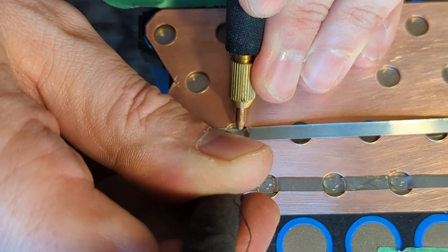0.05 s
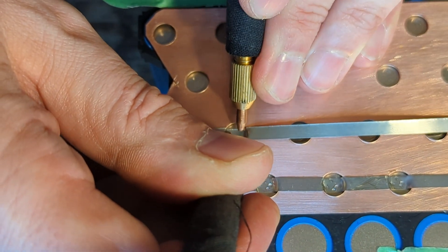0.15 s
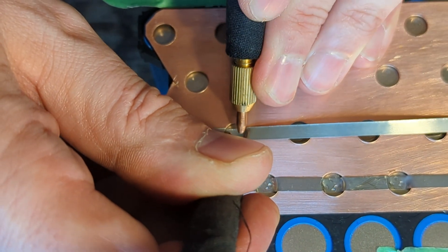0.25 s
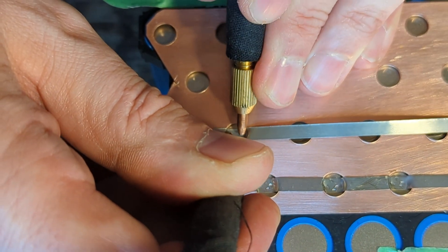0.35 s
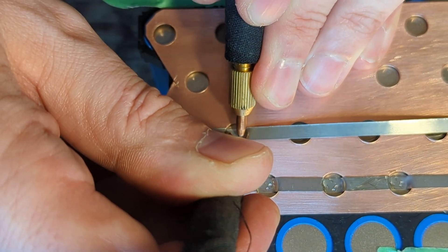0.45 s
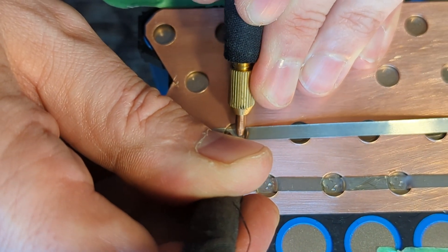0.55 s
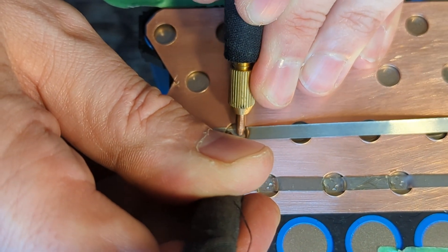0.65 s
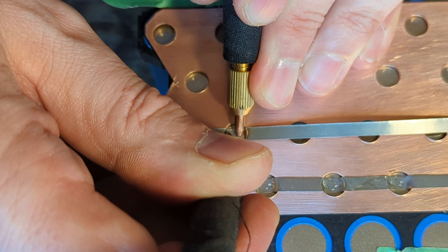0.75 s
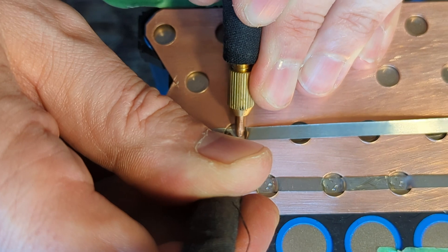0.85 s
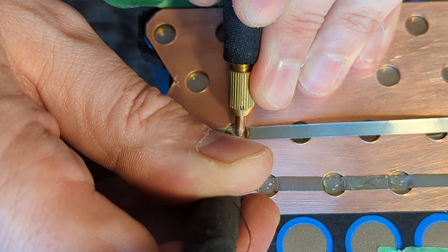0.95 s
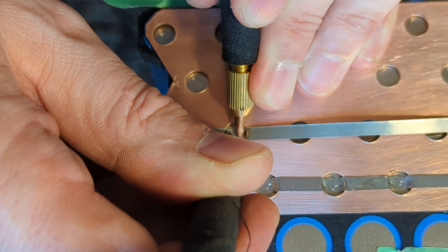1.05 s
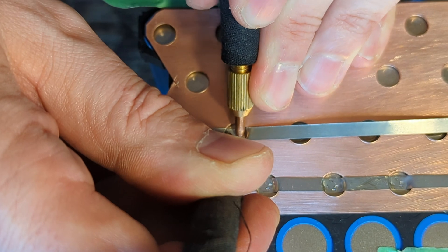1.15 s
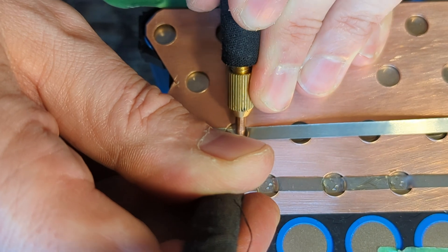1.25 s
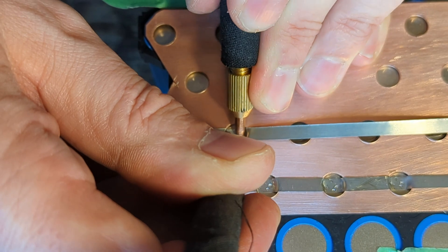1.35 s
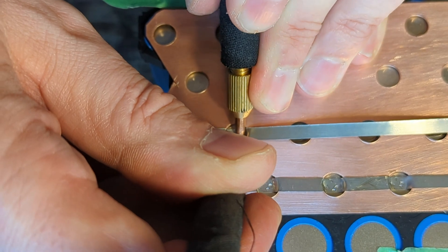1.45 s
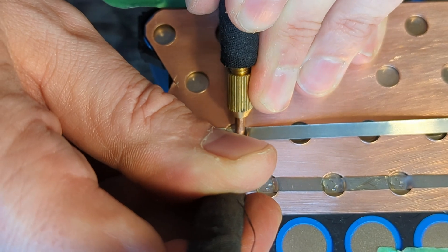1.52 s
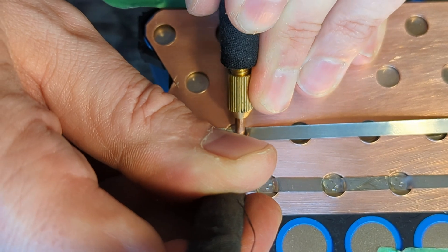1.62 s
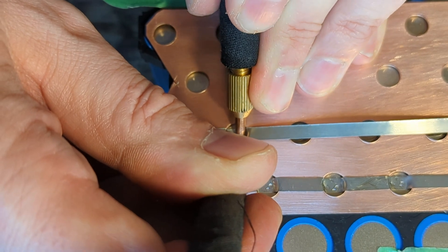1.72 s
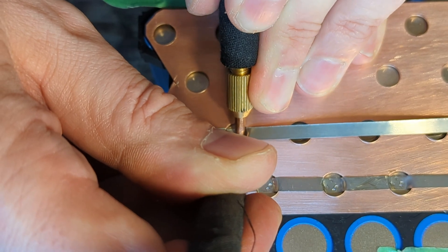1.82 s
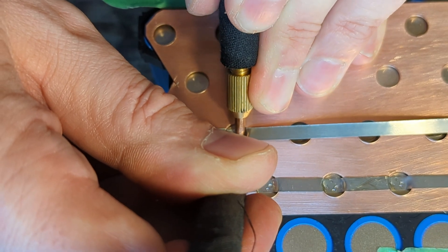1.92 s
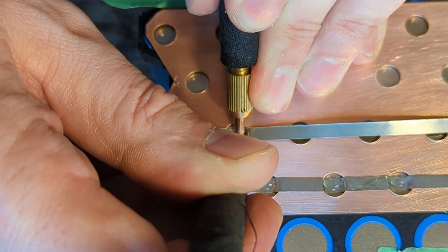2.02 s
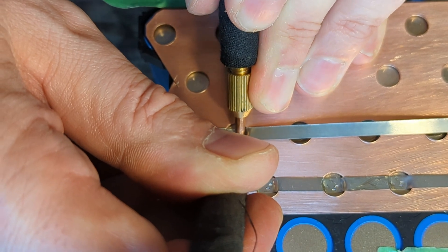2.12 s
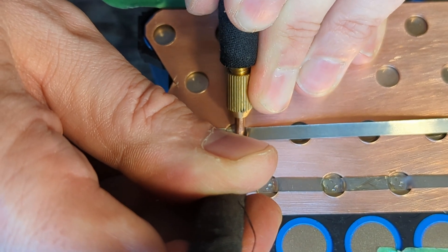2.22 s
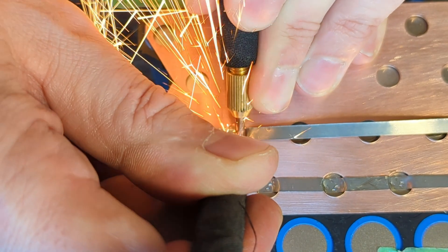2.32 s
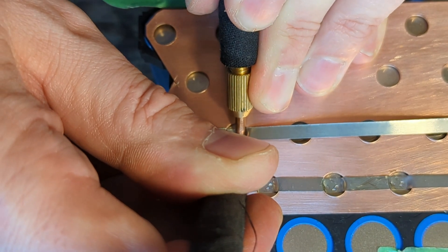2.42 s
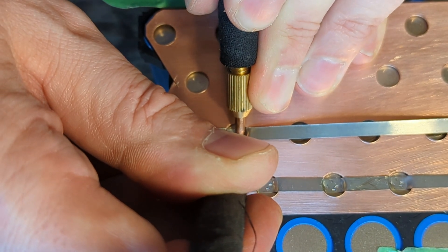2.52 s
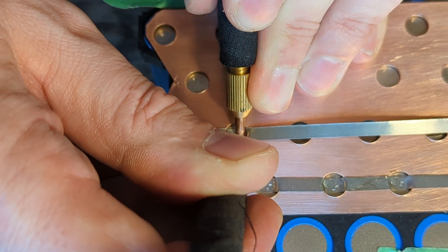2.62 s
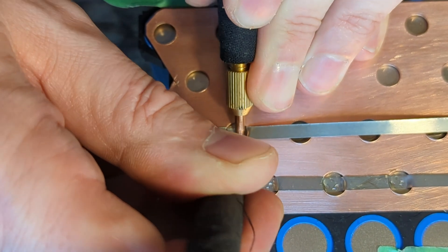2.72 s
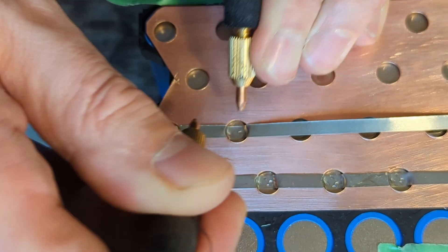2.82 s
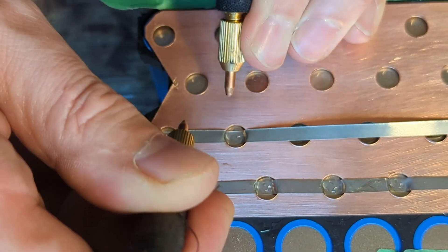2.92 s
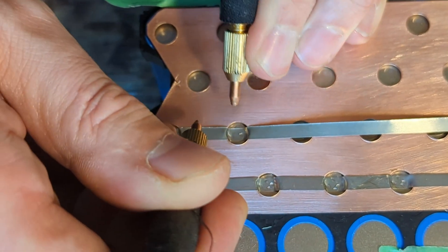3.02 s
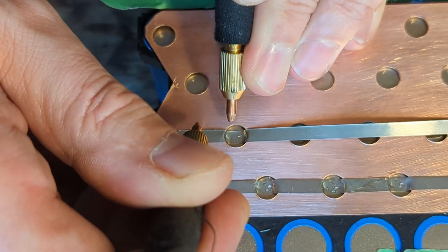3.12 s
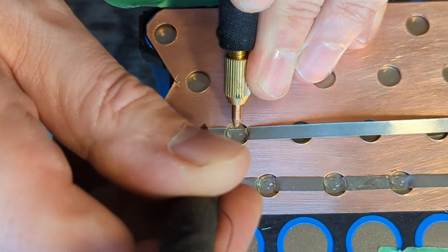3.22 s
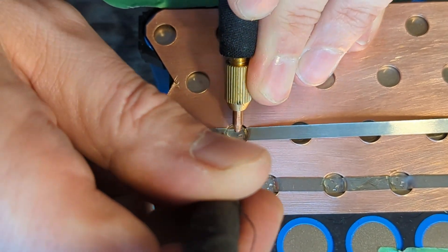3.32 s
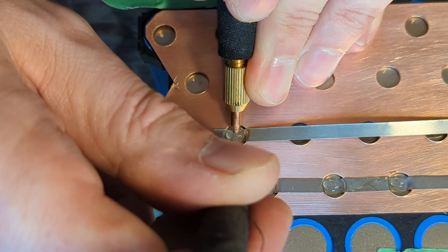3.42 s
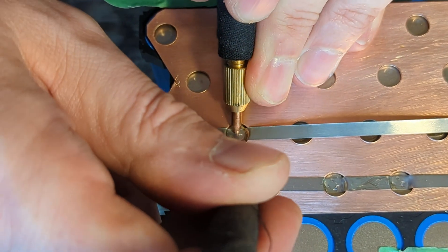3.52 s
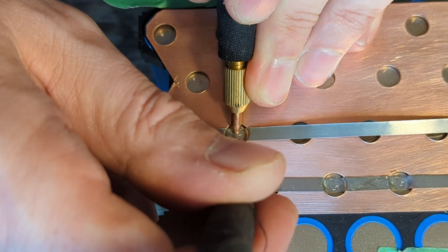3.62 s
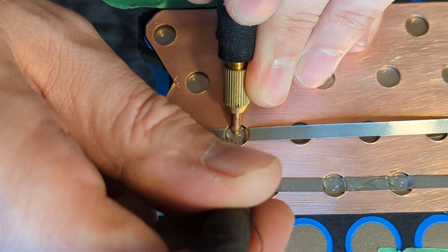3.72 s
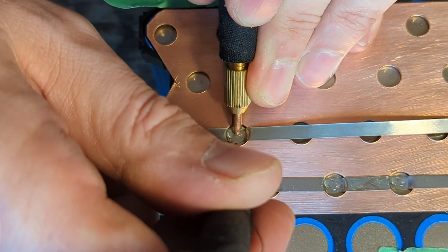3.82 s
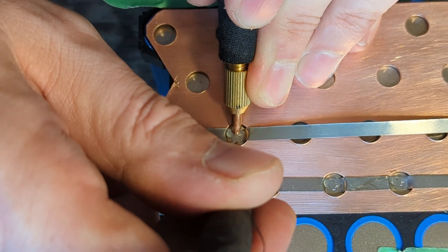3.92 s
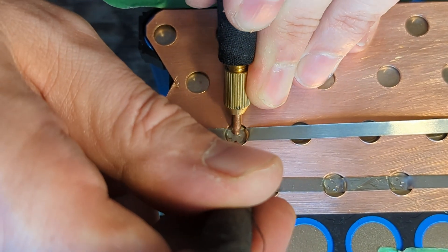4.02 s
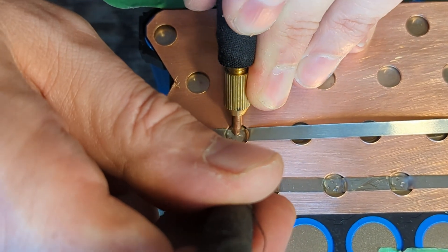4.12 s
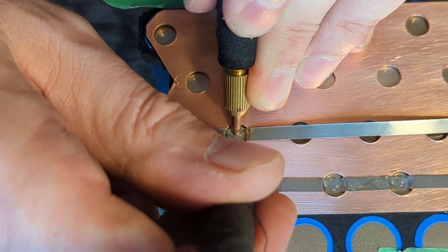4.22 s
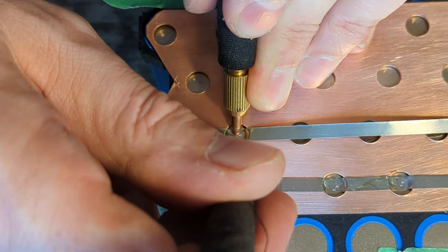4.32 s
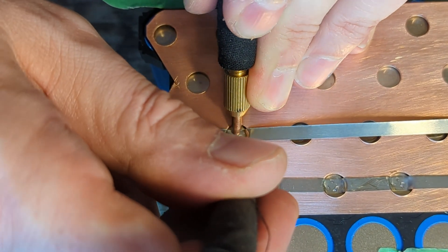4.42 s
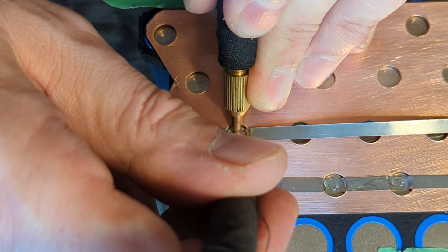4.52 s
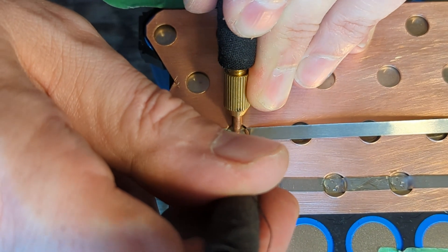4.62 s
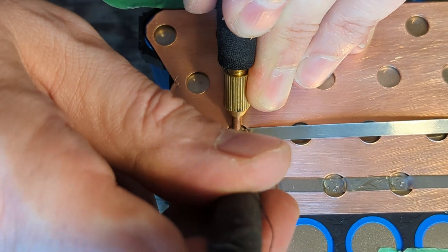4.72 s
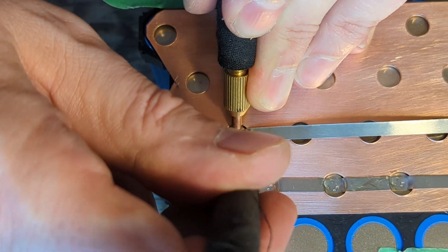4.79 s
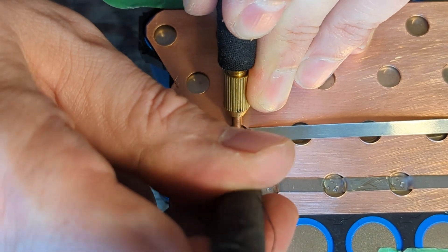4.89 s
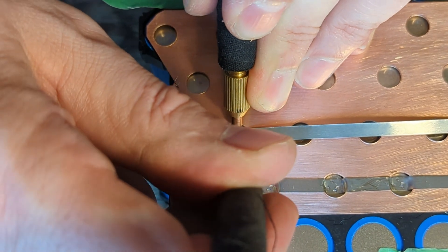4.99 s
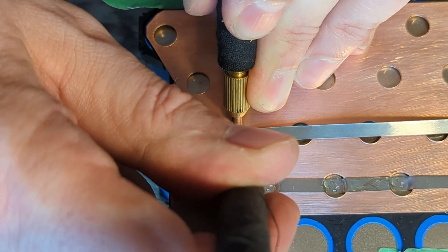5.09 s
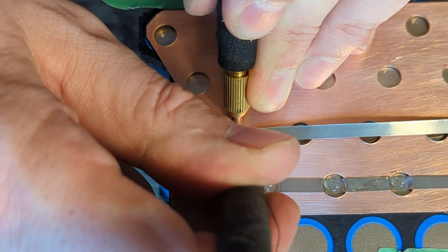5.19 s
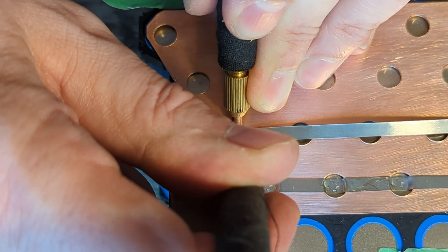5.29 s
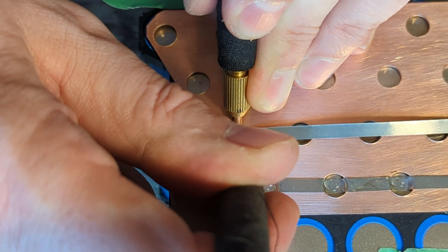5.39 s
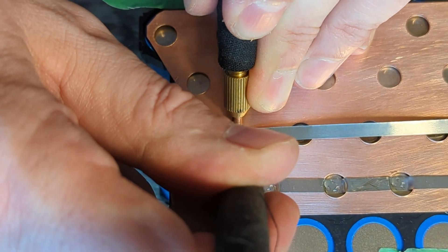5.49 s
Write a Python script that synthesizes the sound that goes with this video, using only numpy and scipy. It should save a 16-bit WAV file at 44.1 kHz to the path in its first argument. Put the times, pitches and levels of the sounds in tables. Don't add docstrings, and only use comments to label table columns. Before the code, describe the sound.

Close stereo microphone on a bench stand: soft low fan drone and airy rush, barely audible copper tip scrape and ticks, then a single dry crack of a spot weld, short ringing strip, tiny sizzling spits and short room tail. Next, small clicks lead into a heavy boomy knock as the probe breaks loose, followed by muffled hand shuffling, soft dull taps and continuing fan.

```python
import sys
import numpy as np
from scipy import signal
from scipy.fft import rfft, irfft, next_fast_len
from scipy.io import wavfile
from scipy.ndimage import uniform_filter1d, map_coordinates

SR = 44100
rng = np.random.default_rng(int(sys.argv[2]) if len(sys.argv) > 2 else 0)


def gain_from_db(level_db):
    decades = np.asarray(level_db, float) / 20
    return 10 ** decades


def wrap_up_sound(samples):
    columns = np.atleast_2d(samples).T
    tamed = np.clip(columns, -1, 1)
    steps = np.round(tamed * 32767).astype(np.int16)
    wavfile.write(sys.argv[1], SR, steps)


N = 244755


def unit(x):
    return x / np.sqrt(np.mean(x ** 2) + 1e-20)


def along(points, hz):
    f, v = np.transpose(points)
    return np.interp(np.log(hz + 1), np.log(f + 1), v)


def colour(points):
    return lambda hz: gain_from_db(along(points, hz))


def wobble(rate):
    knots = rng.standard_normal(int(N * rate / SR) + 4)
    return map_coordinates(knots, [np.arange(N) * rate / SR])


def filtered(x, response):
    m = next_fast_len(x.shape[-1] + 8192)
    spectrum = rfft(x, m) * response(np.fft.rfftfreq(m, 1 / SR))
    return irfft(spectrum, m)[..., :x.shape[-1]]


def causal(spectrum, size=2048):
    magnitude = gain_from_db(along(spectrum, np.fft.rfftfreq(size, 1 / SR)))
    cepstrum = irfft(np.log(magnitude + 1e-6), size)
    cepstrum[1:size // 2] *= 2
    cepstrum[size // 2 + 1:] = 0
    pulse = irfft(np.exp(rfft(cepstrum)), size)
    return pulse / np.linalg.norm(pulse)


# (f/Hz, likeness -1 to 1)
LIKENESS = [(60, 1), (130, 0.94), (290, 0.74), (640, 0.14), (1410, -0.29), (3100, 0.13), (6820, -0.0),
            (15000, -0.02)]


def diffuse(gain):
    def mid_side_gain(hz):
        angle = np.arccos(np.clip(along(LIKENESS, hz), -1, 1)) / 2
        return gain(hz) * [np.cos(angle), np.sin(angle)]

    mid, side = filtered(rng.standard_normal((2, N)), mid_side_gain)
    return unit(np.array([mid + side, mid - side]))


def patchy(x, patchy_db):
    z = signal.stft(x, nperseg=512)[2]
    field = uniform_filter1d(rng.standard_normal(z.shape[1:]), 4, 0)
    field = uniform_filter1d(field, 10, 1)
    return signal.istft(z * gain_from_db(patchy_db * unit(field)), nperseg=512)[1][:, :N]


LEAD_S = .04


def burst(db, spectrum, rise, fall, tail_db, t60):
    u = np.arange(SR // 4) / SR - LEAD_S
    rising = gain_from_db(60 * np.minimum(u, 0) / rise)
    falling = gain_from_db(-60 * u / fall) + gain_from_db(tail_db - 60 * u / t60)
    shape = np.where(u < 0, rising, falling)
    noise = rng.standard_normal((2, len(u))) * shape
    puff = signal.fftconvolve(noise, causal(spectrum)[None], axes=1)[:, :len(u)]
    return gain_from_db(db) * puff * np.linalg.norm(shape) / np.linalg.norm(puff, axis=1, keepdims=True)


def stroke(s, length, attack, release, fade_db):
    u = np.arange(N) / SR - s
    edges = np.clip(u / attack + .5, 0, 1) * np.clip((length - u) / release + .5, 0, 1)
    return edges ** 2 * gain_from_db(-fade_db * np.clip(u / length, 0, 1))


def add(track, s, x):
    track[:, round(s * SR):][:, :x.shape[-1]] += x


# (t/s, level/dB)
AIRFLOW = [(0, 0.5), (.6, 0), (1.2, -0.5), (2.0, 0), (2.8, -1), (3.2, -0.5), (3.6, 0), (4.3, -3.5),
           (4.7, -2), (5.15, -2), (5.55, -1)]
# (f/Hz, level/dB per Hz)
RUMBLE = [(12, -60), (25, -26.5), (32, -18.5), (40, -1.5), (60, 0.5), (87, -2), (125, -15), (156, -16.5),
          (400, -25), (880, -120)]
# (f/Hz, level/dB per Hz)
RUSH = [(76, -35), (130, -4), (156, -3.5), (176, -9.5), (288, -7.5), (325, -9.5), (476, -8), (522, -12.5),
        (708, -3), (764, -12.5), (864, -13), (1120, -12), (1210, -10.5), (2300, -19), (3500, -34.5),
        (5000, -44), (6500, -77), (11000, -120)]
# (f/Hz, level/dB per Hz)
HISS = [(2650, -30), (4500, 0), (4870, -18), (5560, -8.5), (6190, -5.5), (7980, -15.5), (8780, -11.5),
        (9610, -16.5), (15100, -23.5), (16000, -30.5)]
# (f/Hz, width/Hz, rms level/dB)
TONES = [(50.6, 14, -58.5), (76.5, 6, -61), (95, 14, -65), (154, 4, -71.5), (201, 8.06, -75),
         (238, 16, -75), (280, 23, -73), (480, 27, -74), (694, 61, -66.5), (1130, 35, -69),
         (1830, 300, -73), (2614, 110, -78), (2885, 400, -76), (3220, 330, -82), (3900, 300, -86.5),
         (4200, 150, -94.5)]
RUMBLE_DB, RUSH_DB, HISS_DB = -54, -57, -88.0
RUMBLE_GROWS, RUSH_GROWS, TONES_GROW = 1.1, .6, 0.34
SHIFT_S, SHIFT_DB, SHIFT_FADE_S = 2.85, -4.5, .1


def fan():
    t = np.arange(N) / SR
    flow_db = np.interp(t, *np.transpose(AIRFLOW))
    shifted = np.clip((t - SHIFT_S) / SHIFT_FADE_S, 0, 1)
    rumble_db = RUMBLE_DB + RUMBLE_GROWS * flow_db + SHIFT_DB * shifted + 1.2 * wobble(5.6)
    rush_db = RUSH_DB + RUSH_GROWS * flow_db + 0.5 * wobble(7.9)
    out = gain_from_db(rumble_db) * diffuse(colour(RUMBLE))
    out += gain_from_db(rush_db) * patchy(diffuse(colour(RUSH)), patchy_db=2.5)
    out += gain_from_db(HISS_DB) * diffuse(colour(HISS))
    tones = np.zeros((2, N))
    for centre_hz, width_hz, db in TONES:
        tone_db = db + TONES_GROW * (flow_db - flow_db.mean()) + 1.8 * wobble(2.5)
        tones += gain_from_db(tone_db) * diffuse(lambda hz: 1 / (1 + (2 * (hz - centre_hz) / width_hz) ** 2))
    return out + patchy(tones, patchy_db=1.25)


# (f/Hz, t60/s)
SHOP_DECAY = [(200, .3), (700, 0.37), (2000, 0.31), (7000, 0.27), (14000, .19)]


def shop(x):
    hz, t, z = signal.stft(rng.standard_normal((2, SR // 2)), SR, nperseg=256)
    decay = gain_from_db(-60 * t / along(SHOP_DECAY, hz)[:, None])
    tail = signal.istft(z * decay, SR, nperseg=256)[1]
    delayed = np.pad(x, ((0, 0), (300, 0)))
    return signal.fftconvolve(delayed, tail / np.linalg.norm(tail[0]), axes=1)[:, :N]


# (t/s, level/dB, hardness as a power of frequency)
KNOCKS = [
    (2.7952, .5, 0),
    (2.7905, -17, .6),
    (2.784, -33, .3),
    (2.939, -30, -.9),
    (3.004, -38, -.8),
    (3.197, -40, -.6),
    (2.33, -30, 0),
]
# (f/Hz, level/dB, t60/s, first swing up 1 or down -1)
SWAY = [(115, -11, .115, -1), (161, -8.5, .07, 1), (203, .5, .045, 1), (270, 5, .031, 1),
        (357, 4, .019, -1), (497, -2, .025, 1)]
# (f/Hz, level/dB, t60/s, first swing up 1 or down -1)
ROCK = [(107, -17, .07, 1), (163, -22, .1, 1), (234, 5.5, .027, -1), (419, -4, .017, 1),
        (531, -1.5, .019, 1)]
# (f/Hz, level/dB per Hz)
CREAK = [(400, -42), (650, -3), (800, -6), (1000, -17), (2000, -25), (16000, -70)]
CREAK_S, CREAK_DB = 2.754, -47
# (start t/s, length/s, level/dB)
HAND_SLIDES = [
    (2.86, 0.05, -48.5),
    (2.909, .045, -47),
    (2.975, 0.09, -61),
    (3.187, 0.052, -56.5),
    (3.266, 0.278, -56),
    (3.6, 0.21, -61),
]
# (f/Hz, level/dB per Hz)
BENCH = [(70, -41), (130, 1), (200, -3), (300, 3), (400, -13), (560, -28), (900, -58)]


def stand():
    out, t = np.zeros((2, N)), np.arange(SR // 4) / SR
    for s, db, hardness in KNOCKS:
        for modes, ports in ((SWAY, [[1], [1]]), (ROCK, [[1], [-1]])):
            for hz, level, t60, swing in modes:
                u = np.maximum(t - .0164 / np.sqrt(hz), 0)
                onset = (1 - np.exp(-u / .0047)) ** 2
                ring = swing * np.sin(2 * np.pi * hz * u) * onset * gain_from_db(level - 60 * u / t60)
                add(out, s, gain_from_db(db) * (hz / 250) ** hardness * ring * ports)
    add(out, CREAK_S - LEAD_S, burst(CREAK_DB, CREAK, .012, 0.067, -16, .05))
    hands = np.zeros(N)
    for s, length, db in HAND_SLIDES:
        hands += gain_from_db(db) * stroke(s, length, attack=.025, release=0.026, fade_db=1.5)
    return out + hands * gain_from_db(0.96 * wobble(24.9)) * diffuse(colour(BENCH))


# (f/Hz, level/dB per Hz)
TEAR = [(650, -5), (1000, -1.5), (1190, -9), (2180, -2.5), (3120, -20), (5130, -20), (6860, -25),
        (8750, -25.5), (13600, -36), (14800, -33), (16000, -51)]
TEAR_S, TEAR_DB = 2.797, -31.5
# (t/s, peak level/dB, width/s, brightness/dB per octave)
TICKS = [(.6194, -78, 0.011, .1), (.6968, -68, 0.021, -8), (1.2311, -62.5, 0.0056, .3),
         (1.435, -61.5, 0.017, -9), (2.715, -44.5, 0.016, 6), (2.751, -62, 0.011, -4),
         (2.766, -45.5, 0.014, 1), (3.4674, -59.5, 0.011, -10), (3.5535, -56.5, 0.011, -8),
         (4.4632, -68, 0.0096, 5), (5.2015, -70, 0.0064, 8)]
# (f/Hz, level/dB per Hz)
TIP = [(2500, -51), (4300, -7), (5000, -13), (6000, -6), (6900, -2.5), (8800, -1.5), (11000, -13.5),
       (16000, -22)]
# (start t/s, length/s, peak level/dB, first tip resonance f/Hz, resonant share 0-1)
SCRAPES = [
    (.125, 0.15, -73, 7730, 0.88),
    (0.126, .05, -80, 8900, .95),
    (2.72, .02, -70, 8450, .15),
    (2.747, 0.065, -62.5, 8140, 0),
    (2.802, 0.073, -63, 8300, 0),
]
TIP_SAG, TIP_SAG_S = 0.17, 0.029


def probes():
    out, t = np.zeros((2, N)), np.arange(N) / SR
    add(out, TEAR_S - LEAD_S, burst(TEAR_DB, TEAR, 0.019, 0.022, -15.5, 0.1))
    for s, db, width, tilt_db in TICKS:
        tilted = [(hz, level + tilt_db * np.log2(hz / 8000)) for hz, level in TIP]
        add(out, s + 0.00092 - LEAD_S, burst(db - 4.0, tilted, 0.87 * width, width, -9, 3 * width))
    grit = rng.standard_normal((2, N)) * gain_from_db(2.7 * wobble(250))
    broad = unit(filtered(grit, lambda f: gain_from_db(along(TIP, f) + 1.5 * np.log2(f / 8000 + .01))))
    slow = unit(filtered(grit, lambda f: 1 / (1 + (f / 300) ** 2)))
    for s, length, db, first_hz, share in SCRAPES:
        on = stroke(s, length, attack=0.012, release=.012, fade_db=11.5)
        dug_in = 1 - np.exp(-np.maximum(t - s, 0) / TIP_SAG_S)
        hz = first_hz * (1 - TIP_SAG * dug_in)
        share = np.clip(share, 0, 1)
        narrow = np.sqrt(2) * slow * np.sin(2 * np.pi * np.cumsum(hz) / SR)
        out += on * gain_from_db(db) * (np.sqrt(1 - share) * broad + np.sqrt(share) * narrow)
    return out


# (t/s, level/dB)
SPARKS = [
    (2.3232, -22.5),
    (2.3242, -19),
    (2.3250, -14.5),
    (2.3265, -16),
    (2.3296, -21.5),
    (2.336, -35),
]
# (f/Hz, level/dB per Hz)
ARC = [(90, -50), (200, -14), (380, -17.5), (560, -12.5), (780, -2), (1000, -17.5), (1500, -2.5),
       (2500, -13.5), (3400, -8), (3900, -17.5), (4350, -16), (5000, -27.5), (8300, -12.5), (12000, -29),
       (16000, -36.5)]
# (t/s, level/dB)
SPITS = [
    (2.3375, -46.5),
    (2.394, -50),
    (2.400, -50),
]
# (f/Hz, level/dB per Hz)
SPUTTER = [(2500, -32.5), (4500, -9), (6800, 0.5), (8000, -4.5), (9000, -4), (12000, -8.5), (16000, -9.5)]
# (f/Hz, level/dB, t60/s, side share 0-1)
JIG = [(80, -15.5, 0.2007, .05), (200, -14.5, 0.16, .1), (722.3, -3.5, 0.15, 0.4), (887, -2, 0.083, 0.35),
       (1180, -4.5, .07, .1), (1470, 3.5, 0.04, 0.3), (1867, -6, 0.038, 0.3), (1943, -5.5, 0.0804, 0.8),
       (2300, -9.5, 0.048, 0.1), (2854, -11.5, .04, 1), (3180, -8, 0.043, 0), (3510, -12, 0.076, 0.43),
       (8300, -12, 0.027, 0.08), (9240, -7, 0.041, 0.54)]


def weld():
    out, t, start = np.zeros((2, N)), np.arange(SR // 4) / SR, SPARKS[0][0]
    add(out, start - LEAD_S, burst(-27.0, ARC, 0.021, .003, -45.5, 0.0099))
    add(out, start + 0.0018 - LEAD_S, burst(-38.5, SPUTTER, 0.011, 0.052, -9.5, 0.1945))
    for s, db in SPARKS:
        add(out, s - LEAD_S, burst(db + 5.0, ARC, 0.00018, 0.0021, -26.5, 0.064))
    for s, db in SPITS:
        add(out, s - LEAD_S, burst(db, SPUTTER, .002, .008, -13.5, .04))
    for hz, db, t60, side in JIG:
        turn = np.pi / 2 * np.clip(side, 0, 1) * np.array([[1], [-1]])
        rattle = np.cumsum(rng.standard_normal(len(t))) * 0.09 * np.clip(t / 0.033, 0, 1)
        phase = 2 * np.pi * hz * t + rng.uniform(0, 2 * np.pi) + rattle + turn
        ring = np.sin(phase) * (1 - np.exp(-t / .001))
        add(out, start, gain_from_db(db - 21.5 - 60 * t / t60) * ring)
    return out


def scene():
    snap, ticks = weld(), probes()
    return fan() + stand() + snap + ticks + gain_from_db(-14.5) * shop(snap) + gain_from_db(-20) * shop(ticks)


def low_pass(x):
    return signal.sosfilt(signal.butter(12, 16470, fs=SR, output="sos"), x)


def record(dry):
    def band(hz):
        ratio = 34 / (1j * hz + 1e-3)
        bass_cut = 1 / (1 + 1.575 * ratio + ratio ** 2) ** 2
        return bass_cut * np.clip((15950 - hz) / 300, 0, 1)

    return low_pass(filtered(dry, band))


dry = scene()
out = record(dry)
wrap_up_sound(out)
```